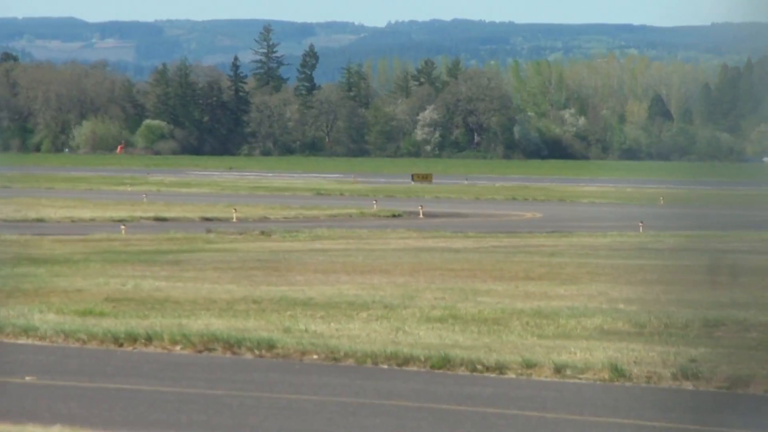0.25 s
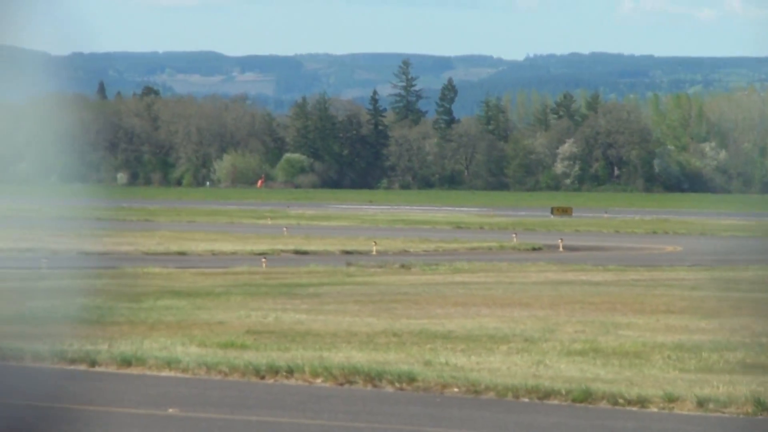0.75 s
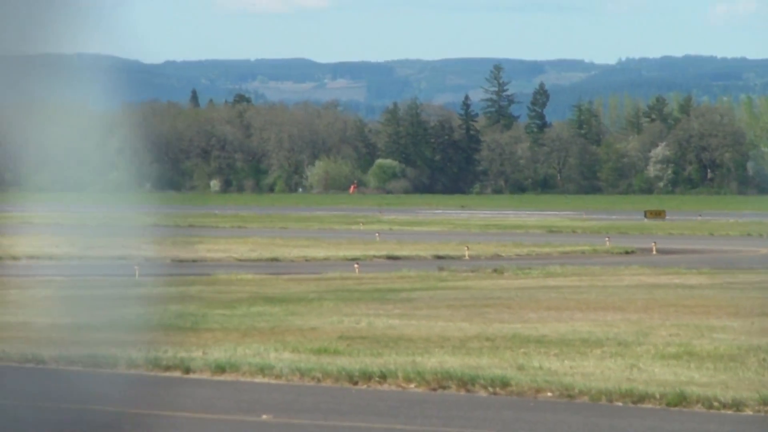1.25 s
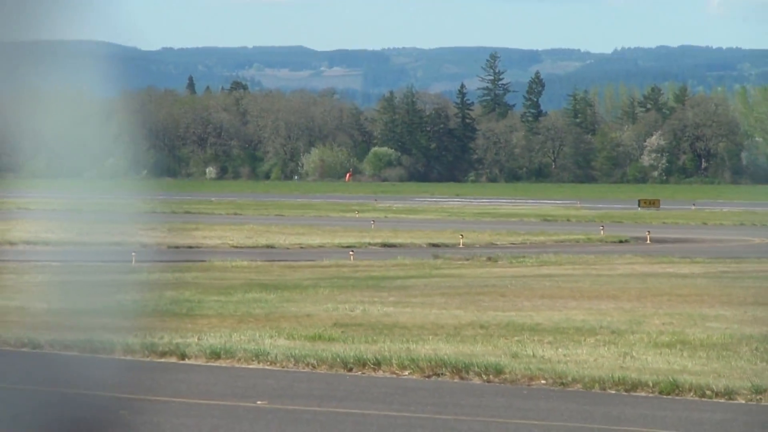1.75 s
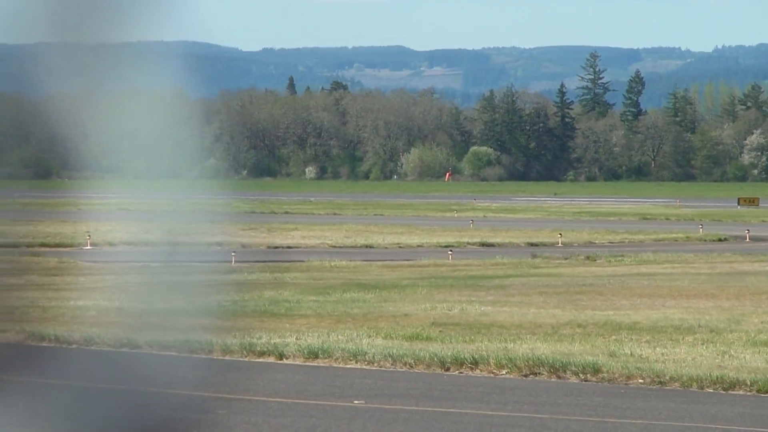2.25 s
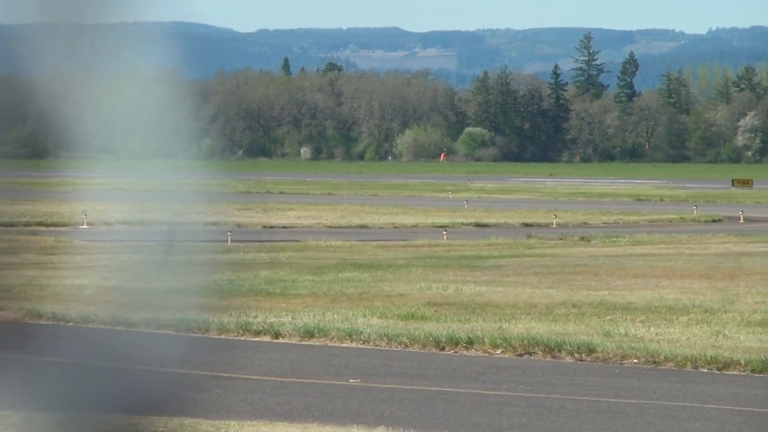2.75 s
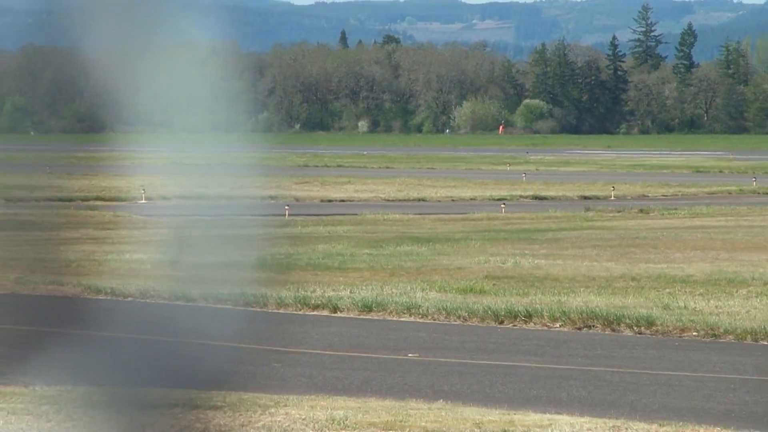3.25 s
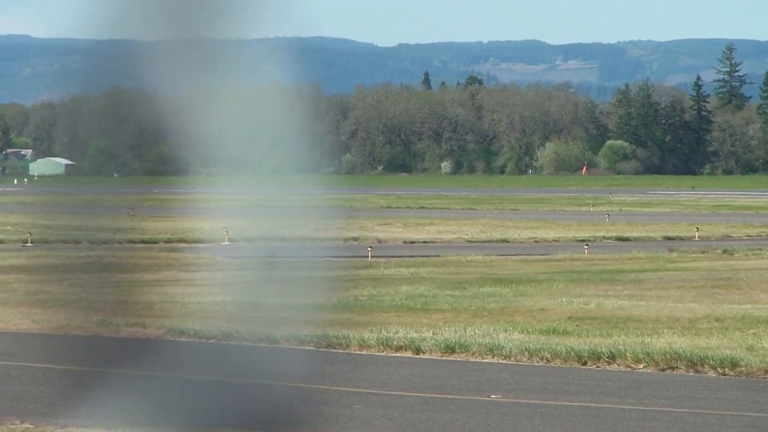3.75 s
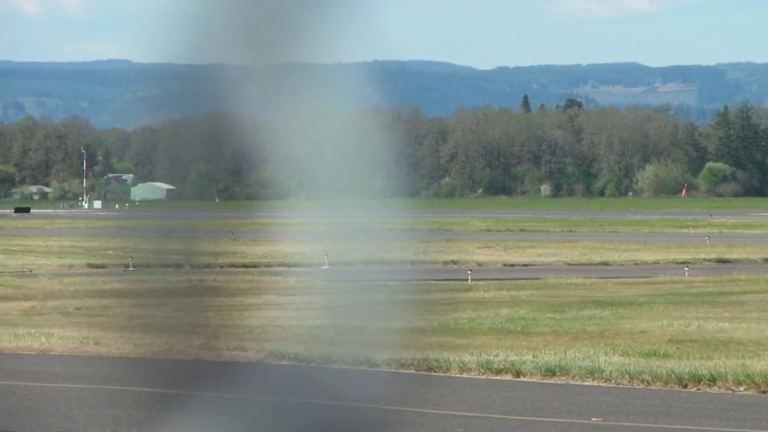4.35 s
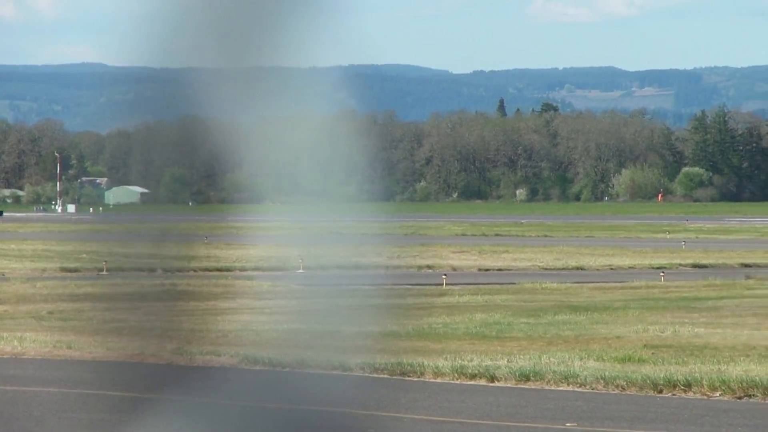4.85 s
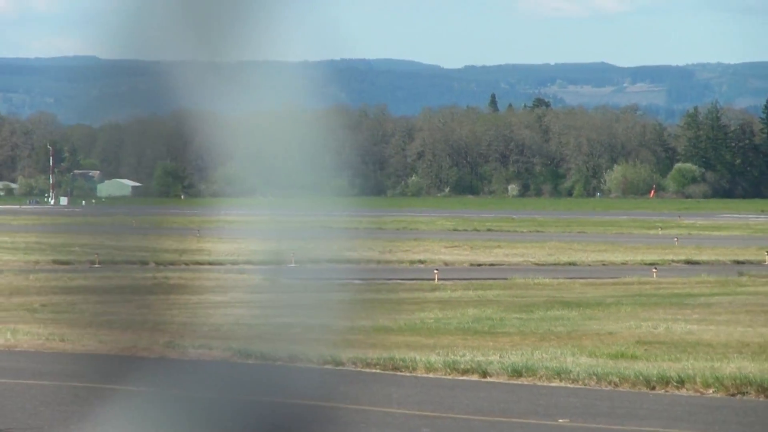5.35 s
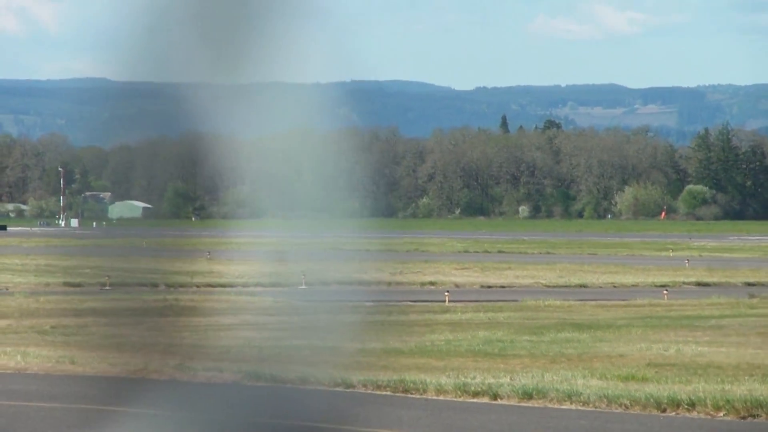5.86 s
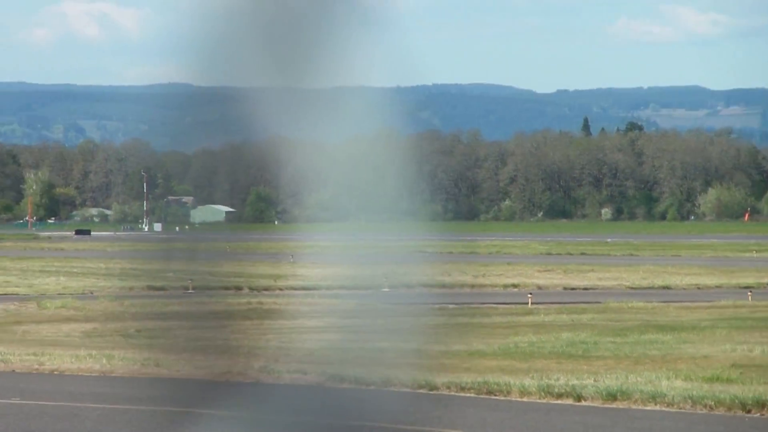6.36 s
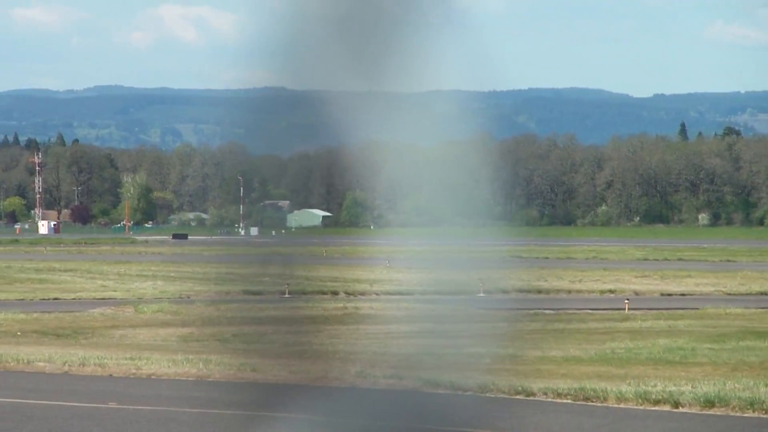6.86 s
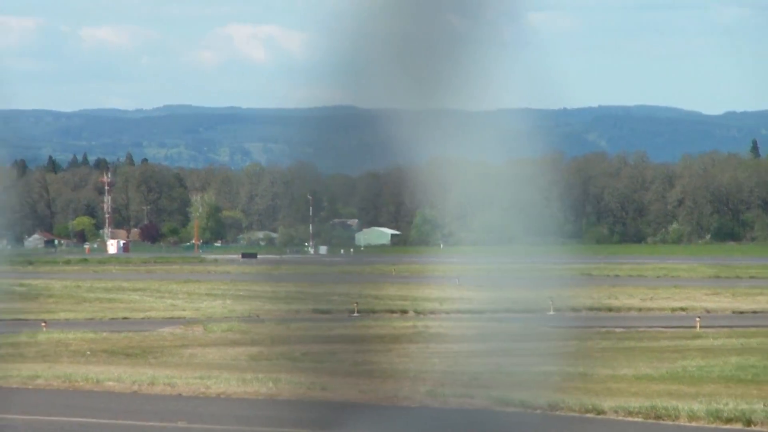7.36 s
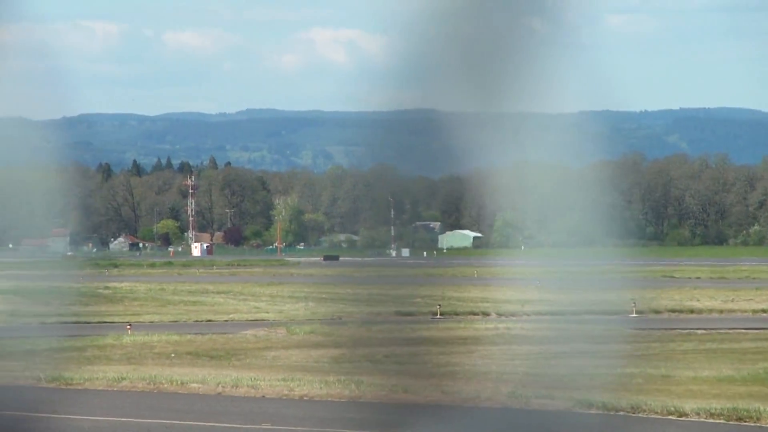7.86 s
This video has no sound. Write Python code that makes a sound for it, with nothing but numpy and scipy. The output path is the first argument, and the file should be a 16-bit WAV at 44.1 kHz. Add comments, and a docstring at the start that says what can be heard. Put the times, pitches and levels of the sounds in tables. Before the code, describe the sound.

Low, fluttering wind thumps on the microphone and gradually eases, while a far jet rushes faintly and a camera lens motor whirs.

```python
"""Windy camera at an airfield fence.

Wind buffets the left microphone port of a hand-held camera while a jet rushes far off. The sheltered
right port hears the lens motors ring the shell: they step once a picture field, then pause for a second
and whistle. A finger knocks twice, the focus peeps, the electronics whine and hiss. The recorder widens
the stereo, cuts three narrow notches and ticks on hard gusts."""
import sys
import numpy as np
from scipy import signal
from scipy.fft import rfft, irfft, next_fast_len
from scipy.io import wavfile
from scipy.ndimage import uniform_filter1d

SR = 44100
rng = np.random.default_rng(int(sys.argv[2]) if len(sys.argv) > 2 else 0)


def file_out(sig):
    """Save sig as 16-bit WAV at sys.argv[1]."""
    # one column per channel
    cols = np.atleast_2d(sig).T
    # limit, then scale
    lim = np.clip(cols, -1, 1)
    pcm = np.round(lim * 32767).astype(np.int16)
    wavfile.write(sys.argv[1], SR, pcm)


N = 358091
T = np.arange(N) / SR

# Fader and tone ride of the wind: t/s, level/dB, brightness above 450 Hz/dB
WIND_RIDE = [(0.0, -34, 8), (0.05, -15, -1.5), (0.18, -15, -1.5), (0.5, -17.5, -3.5), (1.0, -16.5, -6.5),
             (1.25, -18.5, 0), (1.5, -15.5, -7), (2.1, -19, -1.5), (2.4, -17, -3), (2.75, -18, -8.5),
             (2.95, -19, -7.5), (3.3, -21.5, -8), (3.6, -21, -11), (3.9, -23.5, -11), (4.36, -23.5, -27),
             (4.43, -36, -10), (4.5, -25.5, -35), (4.86, -24, -8.5), (5.1, -25.5, -23), (5.43, -26.5, -32),
             (5.57, -23, -11), (5.67, -29, -32), (5.87, -22, -4), (5.91, -28, -7), (6.0, -13.5, -17),
             (6.22, -36.5, -7), (6.44, -21, -37), (6.5, -28, -16), (6.64, -22.5, -11), (6.93, -31.5, -27),
             (7.0, -20, -44), (7.17, -22.5, -8), (7.3, -23, -34), (7.6, -24.5, -23), (7.95, -21, -31),
             (8.04, -16, -28), (8.12, -25, -18)]
# Body of the eddies: f/Hz, level/dB
EDDY_EQ = [(60, -47.5), (110, -13), (170, -4.5), (280, 2), (400, -0.5), (550, -2.5), (750, -10),
           (1000, -22), (1400, -51), (2000, -40)]
# Low bed under the eddies: f/Hz, level/dB
RUMBLE_EQ = [(20, -44.5), (32, -28), (50, -28), (80, -11.5), (130, -3), (190, 1), (280, -1), (400, -19)]
STRONG_WIND_DB, FLUTTER_DB, FLUTTER_HZ, BRIGHT_FLICKER_DB = -18, 1.5, 32.4, 2


def wind(eddies_per_s, clump_db, rumble_db):
    """Eddies of uneven size cross a port in clumps, over a smooth rumble that follows their force."""
    level_db, bright_db = in_time(WIND_RIDE)
    bright_db = bright_db + BRIGHT_FLICKER_DB * drift(9)
    eddies = (rng.random(N) < eddies_per_s / SR) * rng.standard_normal(N)
    clumps = np.minimum(drift(65) + 0.84 * drift(18), 1.3)
    flow = colour(eddies * amp(clump_db * clumps + FLUTTER_DB * drift(FLUTTER_HZ)), EDDY_EQ)
    body = signal.sosfiltfilt(signal.butter(2, 450, fs=SR, output="sos"), flow)
    force_db = uniform_filter1d(level_db, size=SR // 2) - STRONG_WIND_DB
    rumble = colour(rng.standard_normal(N), RUMBLE_EQ)
    rumble *= amp(STRONG_WIND_DB + 0.55 * force_db + rumble_db)
    return amp(level_db) * (body + amp(bright_db) * (flow - body)) + rumble


# Hard puffs, the accents of the wind: crest t/s, level/dB, f/Hz, snap relative to the puff/dB
PUFF_HITS = [(0.032, -3.5, 266, -26), (0.103, -8, 470, -14), (0.152, -2, 485, -25), (0.167, -8.5, 443, 0.5),
             (0.178, -7, 450, -8), (0.198, -2, 370, -15), (0.21, -7.5, 370, -1), (0.242, -5, 450, -15),
             (0.295, -7.5, 426, -3.5), (0.335, -2.5, 367, -20), (0.451, -2, 346, -17),
             (0.51, -10.5, 340, -3), (0.55, -8, 370, -17), (0.564, -4, 338, -6), (0.573, -14, 360, 5),
             (0.633, -1.5, 390, -20), (0.647, -6, 304, -5), (0.722, -4, 460, -19), (0.786, -11, 340, -9),
             (0.803, -5.0, 340, -18), (0.875, -7.5, 295, -14), (0.889, -9, 400, -3), (0.919, -5.5, 368, -7),
             (0.95, -7.0, 300, -10), (0.979, -3.5, 403, -8), (1.047, -7, 400, -15), (1.063, -6.5, 346, -23),
             (1.172, -0.5, 306, -27), (1.187, -6.5, 456, -10), (1.213, -3.5, 320, -17),
             (1.229, -2, 425, -16), (1.238, -7, 310, -7), (1.321, -4.5, 287, -26), (1.381, -6, 352, -28),
             (1.438, -4, 307, -11), (1.501, -5.5, 356, -19), (1.521, -4, 308, -18), (1.588, -11, 383, -22),
             (1.616, -15, 350, -17), (1.66, -6, 436, -15), (1.685, -8, 352, -8), (1.725, -5, 280, -11),
             (1.742, -11.5, 440, -8), (1.8, -6.0, 360, -14), (1.869, -3, 417, -24), (1.905, -2.5, 340, -16),
             (1.953, -4, 410, -12), (1.972, -8, 352, -21), (1.984, -7, 303, -23), (2.065, -2, 354, -14),
             (2.083, -7, 270, -13), (2.184, -3.5, 294, -23), (2.195, -4.5, 426, -13), (2.224, -8, 420, -10),
             (2.281, -4.5, 398, -9), (2.305, -12, 328, -19), (2.35, -8, 340, -17), (2.389, -7, 424, -1.5),
             (2.446, -5, 377, -21), (2.465, -9, 340, -18), (2.517, -7.5, 333, -20), (2.642, -7.5, 365, -24),
             (2.702, -6.5, 302, -26), (2.746, -7, 314, -23), (2.886, -8, 400, -21), (2.914, -4, 393, -14),
             (2.935, -11, 265, -1.5), (3.053, -8.5, 320, -24), (3.092, -9.5, 265, -20),
             (3.183, -7.5, 337, -13), (3.202, -10, 423, -18), (3.225, -9.5, 310, -21),
             (3.292, -9.5, 340, -17), (3.347, -9, 320, -17), (3.465, -2.5, 390, -11),
             (3.498, -2.5, 315, -21), (3.589, -9, 300, -14), (3.743, -9.5, 270, -19), (3.833, -9, 350, -27),
             (3.847, -9.5, 242, -24), (3.979, -9, 336, -15), (4.021, -9.5, 320, -17),
             (4.097, -11, 282, -23), (4.373, -12, 316, -26), (4.481, -11.5, 340, -28), (4.51, -8, 298, -19),
             (4.599, -9.5, 286, -25), (4.625, -10, 378, -18), (4.666, -10.5, 265, -18),
             (4.809, -14, 330, -20), (4.855, -9, 305, -24), (4.866, -10.5, 366, -13),
             (5.051, -7.5, 310, -13), (5.097, -13.5, 370, -28), (5.153, -15, 314, -17),
             (5.525, -13, 243, -23), (5.568, -11, 327, -23), (5.578, -6.5, 340, -34),
             (5.746, -12.5, 300, -23), (5.841, -5, 265, -23), (5.85, -14, 332, -11), (5.87, -8, 240, -20),
             (5.879, -9.5, 332, -23), (5.965, -10, 355, -22), (5.993, -4.5, 310, -13),
             (6.103, -12, 309, -21), (6.351, -13, 266, -22), (6.39, -14.5, 274, -23),
             (6.441, -5.5, 288, -29), (6.47, -11.5, 312, -23), (6.549, -11.5, 410, -20),
             (6.591, -11, 294, -15), (6.636, -7, 310, -35), (6.77, -11, 264, -23), (7.035, -10, 292, -26),
             (7.049, -10, 272, -21), (7.107, -12.5, 264, -26), (7.129, -12, 298, -17),
             (7.171, -8, 322, -21), (7.435, -13, 294, -11), (7.569, -10.5, 365, -26),
             (7.678, -16, 282, -26), (7.837, -8.5, 288, -18), (8.037, -3.5, 315, -28),
             (8.048, -11, 282, -22)]


def puffs(cycles=3.17, snap_hz=730):
    """Each hard puff pushes the membrane either way; a shorter snap rides on its crest."""
    out = np.zeros(N)
    for (s, db, hz, snap_db), (phase, way) in zip(PUFF_HITS, rng.random((len(PUFF_HITS), 2)) - .5):
        thump = amp(db) * swing(hz, cycles, phase)
        snap = amp(db + snap_db) * swing(snap_hz, cycles, phase)
        for part in thump, snap:
            at = int(s * SR) - len(part) // 2
            out[at:at + len(part)] += np.sign(way) * part
    return out


def swing(hz, cycles, phase):
    """One sharp swing of the membrane with a small swing on both sides."""
    size = int(cycles / hz * SR)
    return np.hanning(size) ** 2 * np.cos(2 * np.pi * hz * (T[:size] - T[size // 2]) + phase)


def puff_ducking(depth=0.45, span_s=0.0071):
    """Gain that ducks the flow where it bunches into a hard puff."""
    crests = clicks([s for s, *_ in PUFF_HITS], 1)
    dips = signal.fftconvolve(crests, np.hanning(int(span_s * SR)), "same")
    return 1 - np.clip(depth * dips, 0, .9)


# Resonances of the camera shell: f/Hz, t60/s, light step/dB, heavy step/dB, knock/dB, hum/dB,
# hum change in the pause/dB
SHELL_MODES = [(693, 0.026, -55, -32.5, 0, -57.5, -10), (902, 0.026, -56.5, -28.5, 7, -54.5, -15),
               (1053, 0.06, -72, -44.5, -30, -67, 11.5), (1418, 0.024, -56, -51, -30, -52.5, 0.5),
               (1544, 0.023, -40.5, -26, 12, -46.5, -2.5), (1844, 0.014, -31, -30.5, 4.5, -43, -2),
               (2390, 0.037, -58.5, -50, -3.5, -73.5, -13), (3770, 0.0043, -42.5, -47, -26, -65, -27),
               (4656, 0.0072, -55.5, -51.5, -53, -71, -10), (5760, 0.0083, -55, -60.5, -43, -87.5, -10),
               (7200, 0.0014, -56.5, -57.5, -40, -86, 2), (8100, 0.0046, -49, -51, -54, -93, 1)]
# Force of the steps, one list before the pause and one after: t/s, level/dB
STEP_RIDES = [
    [(0.0, -2), (5.22, 0)],
    [(6.26, 1), (8.12, -2)],
]
# Bright snaps as the stepping stops and starts: t/s, level/dB
CLUTCH_SNAPS = [(5.228, -37.5), (6.23, -37.5), (6.246, -47)]
FIELD_HZ, FIRST_STEP_S, GEAR_PLAY_S = 60 / 1.001, .0072, .0006
LIGHT_SPREAD_DB, HEAVY_SPREAD_DB, TONE_SPREAD_DB = 2.2, 3.4, 1.8
PAUSE_START_S, PAUSE_END_S = 5.235, 6.24
PAUSED = (T > PAUSE_START_S) & (T < PAUSE_END_S)


def camera_shell():
    """Motor steps, heavy and light in turn, ring the shell, as do motor hum, clutch and finger."""
    steps = np.arange(FIRST_STEP_S, N / SR - .01, 1 / FIELD_HZ)
    count = len(steps)
    heavy = np.arange(count) % 2 == 0
    running = (steps < PAUSE_START_S) | (steps > PAUSE_END_S)
    force_db = np.interp(steps, *np.transpose(STEP_RIDES[0] + STEP_RIDES[1]))
    force_db += np.where(heavy, HEAVY_SPREAD_DB, LIGHT_SPREAD_DB) * rng.uniform(-1.46, 1, count)
    force = amp(force_db) * running * rng.choice([-1, 1], count)
    landing_s = .002 + GEAR_PLAY_S * (rng.random(count) - .5)
    clutch_s, clutch_db = np.transpose(CLUTCH_SNAPS)
    clutch = clicks(clutch_s, amp(clutch_db))
    finger = finger_knocks()
    out = np.zeros(N)
    for hz, t60, light_db, heavy_db, knock_db, hum_db, pause_db in SHELL_MODES:
        mode_db = np.where(heavy, heavy_db, light_db) + TONE_SPREAD_DB * rng.standard_normal(count)
        # a heavy step hits the low modes together, a little late; all else rattles
        late_s = np.where(heavy & (hz < 1700), landing_s, rng.uniform(0, .0011, count))
        blows = clicks(steps + late_s, force * amp(mode_db)) + clutch * (hz > 2000)
        hum = amp(hum_db + pause_db * PAUSED) * unit(ring(rng.standard_normal(N), hz, t60))
        knock = amp(knock_db) * ring(finger, hz, t60=min(t60, .009))   # the finger damps the shell
        # soft contacts carry little above each mode
        out += band(ring(blows, hz, t60) + hum + knock, "low", 1.207 * hz)
    return band(out, "high", 510)


# Handling knocks: t/s, level/dB, hardness as low-pass f/Hz
FINGER_HITS = [(0.6141, -10.8, 8000), (2.911, -26, 2000)]


def finger_knocks(bounce_s=.0012, bounce_db=-5.5):
    """Force of a finger that strikes the shell and bounces once, softly."""
    out = np.zeros(N)
    for s, db, top_hz in FINGER_HITS:
        bounce = band(clicks([s + bounce_s], amp(db + bounce_db)), "low", 2600)
        out += band(clicks([s], amp(db)) + bounce, "low", top_hz)
    return out


# Pitch bends of the whistle: arrival t/s, aim f/Hz, hold/s
WHISTLE_BENDS = [(5.272, 7340, 0.0053), (5.318, 4200, .008), (5.347, 4900, .02), (5.374, 4700, 0.045),
                 (5.488, 8630, 0.0032), (5.606, 6500, 0.0033), (5.67, 4250, .012), (5.703, 4650, .03),
                 (5.783, 7670, 0.0054), (5.855, 4650, 0.058), (5.92, 5940, 0.0074), (5.988, 7200, 0.0045),
                 (6.085, 6550, 0.04), (6.13, 6100, .03), (6.2, 8800, .035)]
REST_HZ, GLIDE_HZ_PER_S = 5280, 62000


def whistle_pitch():
    """From its rest the motor glides at one speed to each aim, holds, and glides back."""
    hz = np.full(N, float(REST_HZ))
    for s, aim_hz, hold_s in WHISTLE_BENDS:
        away_s = np.maximum(np.maximum(s - T, T - s - hold_s), 0)
        reach_hz = np.maximum(abs(aim_hz - REST_HZ) - GLIDE_HZ_PER_S * away_s, 0)
        hz = np.where(reach_hz > abs(hz - REST_HZ), REST_HZ + np.sign(aim_hz - REST_HZ) * reach_hz, hz)
    return hz


def motor_whistle(rest_db=-66.5, db_per_khz=1.8, octave_db=1.5, air_db=-19):
    """In the pause the free-running motor sings at a rate that moves in stairs; faster is louder."""
    hz = whistle_pitch()
    stairs_hz = hz[np.arange(N) // 350 * 350]
    # scratchier while it glides or crawls
    scratch = .045 * np.clip(abs(np.gradient(hz)) * SR / 30000, np.where(hz < REST_HZ, .7, .3), 1)
    phase = 2 * np.pi * np.cumsum(stairs_hz * (1 + scratch * drift(300))) / SR
    gate = uniform_filter1d(1. * PAUSED, size=200)
    level = gate * amp(rest_db + db_per_khz * (hz - REST_HZ) / 1000 + 2.5 * drift(40))
    slow = uniform_filter1d(np.clip((5400 - stairs_hz) / 100, 0, 1), size=200)
    song = level * (np.sin(phase) + slow * amp(octave_db) * np.sin(2 * phase))
    air = amp(air_db) * level * (np.sin(2 * phase) + np.sin(3 * phase))
    # the shell passes two bands
    song = band(band(song, "high", 5150, order=8), "low", 10350, order=10)
    return song + band(air, "high", 14200, order=12)


# Focus peeps: centre t/s, rung of the pitch ladder
PEEP_CUES = [(0.216, 9), (1.4, 12), (1.51, 12), (2.63, 12), (2.65, 10), (2.752, 11), (2.772, 13),
             (2.84, 12), (2.938, 11), (2.955, 10), (2.985, 14), (3.15, 13), (3.172, 11), (3.235, 8),
             (3.252, 9), (3.32, 9), (3.37, 8), (3.405, 8), (3.62, 13), (3.638, 11), (3.687, 9), (4.17, 8),
             (4.205, 8), (4.24, 8), (4.272, 8), (4.306, 8), (4.372, 12), (4.605, 11), (4.62, 9),
             (4.875, 11), (4.888, 9), (6.975, 11), (7.095, 12), (7.11, 11), (7.157, 12), (7.177, 11),
             (7.508, 10), (7.59, 12), (7.74, 12), (7.862, 13), (7.88, 12), (7.94, 8)]


def focus_peeps(rung_hz=480, level_db=-63.5, spread_db=2, length_s=0.024):
    """The focus motor gives brief, slightly unsteady peeps on a ladder of pitches."""
    out, size = np.zeros(N), int(length_s * SR)
    phase = 2 * np.pi * np.cumsum(rung_hz * (1 + .003 * drift(150))) / SR
    for (s, rung), chance in zip(PEEP_CUES, rng.uniform(-0.9, 1, len(PEEP_CUES))):
        at = int(s * SR) - size // 2
        db = level_db + spread_db * chance + 3.5 * max(10 - rung, 0)   # low rungs are louder
        out[at:at + size] += amp(db) * np.hanning(size) * np.sin(rung * phase[at:at + size])
    return out


# Slow swell of the jet: t/s, level/dB
JET_RIDE = [(0, -46.5), (2, -45.5), (4, -44), (6, -46.5), (8.12, -44.5)]
# Its distant midrange rush: f/Hz, level/dB
JET_EQ = [(300, -29), (600, -2.5), (900, -2.5), (1200, -12.5), (1900, -13.5), (2400, -24.5), (2800, -29),
          (3500, -44)]


def far_jet():
    """A far jet rushes and wavers, weaker in the right port."""
    level = amp(in_time(JET_RIDE)[0] + 2 * drift(5.7))
    return level * colour(rng.standard_normal((2, N)), JET_EQ) * amp([[0], [-8]])


# Fader ride of the sensor whine: t/s, level/dB
SCAN_RIDE = [(0.0, -74), (1.0, -72), (2.3, -65), (3.9, -62.5), (8.12, -63.5)]
# Thin, steady electronic tones: f/Hz, level/dB, onset t/s
THIN_TONES = [(9000, -78.5, 1.5), (15000, -90.5, 1.5)]
SCAN_HZ = 4.5e6 / 572


def electronics():
    """The sensor scan whine flips its sign every frame, which splits it into a comb; two tones join."""
    flip = np.clip(40 * np.sin(np.pi * FIELD_HZ / 2 * T), -1, 1)
    whine = amp(in_time(SCAN_RIDE)[0]) * flip * np.sin(2 * np.pi * SCAN_HZ * T)
    return whine + sum(amp(db) * (T > s) * np.sin(2 * np.pi * hz * T) for hz, db, s in THIN_TONES)


# Noise floor: t/s, level/dB
HISS_RIDE = [(0.0, -64), (0.29, -70.5), (1.02, -67.5), (3.0, -67), (8.12, -67)]
# Its airy top: f/Hz, level/dB
HISS_EQ = [(2500, -20), (3500, -13), (4800, -14.5), (5600, -5), (7500, -4), (9000, -6.5), (10500, -14.5),
           (11400, -30), (13800, -39), (15000, -19), (16000, -20)]


def microphone_hiss():
    """Self-noise of the microphone, a little stronger on the left."""
    noise = colour(rng.standard_normal((2, N)), HISS_EQ)
    return amp(in_time(HISS_RIDE)[0]) * noise * amp([[1.5], [-1.5]])


# Sharp ticks on hard gusts: t/s, level/dB, low-treble body relative to the tick/dB
TICK_HITS = [(0.0305, -25.5, 8), (0.074, -41, 9), (0.1937, -36, 8), (0.979, -28, 14), (1.2292, -29, 8),
             (1.9037, -27, 8), (2.0638, -28.5, 14)]


def gust_ticks():
    """The recorder ticks: a bare click with some body, weaker and inverted on the right."""
    s, db, body_db = np.transpose(TICK_HITS)
    body = band(band(clicks(s, amp(db + body_db)), "low", 3500), "high", 1800)
    return (clicks(s, amp(db)) + body) * amp([[0], [-11]]) * [[1], [-1]]


def amp(db):
    """dB to gain."""
    return 10 ** (np.asarray(db) / 20)


def unit(x):
    """Scale to rms 1."""
    return x / np.sqrt(np.mean(x ** 2) + 1e-20)


def in_time(rows):
    """Table columns as curves over all samples."""
    s, *columns = np.transpose(rows)
    return [np.interp(T, s, c) for c in columns]


def colour(x, eq):
    """Shape a flat signal with an EQ curve; rms 1."""
    hz, db = np.transpose(eq)
    size = next_fast_len(N)
    grid_hz = np.fft.rfftfreq(size, 1 / SR) + 1
    gain = amp(np.interp(np.log(grid_hz), np.log(hz), db, left=-90, right=-90))
    return unit(irfft(rfft(x, size) * gain, size)[..., :N])


def drift(hz):
    """Smooth random modulation up to about hz; rms 1."""
    r = np.exp(-2 * np.pi * hz / SR)
    return unit(signal.lfilter([1], [1, -2 * r, r * r], rng.standard_normal(N + SR))[SR:])


def clicks(times, gains):
    """A train of one-sample clicks."""
    out = np.zeros(N)
    out[(np.asarray(times) * SR).astype(int)] = gains
    return out


def ring(x, hz, t60):
    """Resonator: a unit click sets a sine of height 1 ringing."""
    r, w = amp(-60 / (t60 * SR)), 2 * np.pi * hz / SR
    return signal.lfilter([0, np.sin(w)], [1, -2 * r * np.cos(w), r * r], x + 1e-18)


def band(x, kind, hz, order=2):
    """Butterworth low- or high-pass."""
    return signal.sosfilt(signal.butter(order, hz, kind, fs=SR, output="sos"), x)


def scene():
    """Left port: full wind; right port: machinery and faint wind; jet and hiss in both."""
    bed = far_jet() + microphone_hiss()
    buffeting = puff_ducking() * wind(eddies_per_s=900, clump_db=1.94, rumble_db=-7.5) + puffs()
    membrane = 0.63 * np.tanh(buffeting / 0.75)   # it stiffens on large swings
    left = band(membrane, "low", 1900, order=4)
    machinery = band(camera_shell() + focus_peeps(), "low", 12000, order=12)
    machinery += motor_whistle() + electronics()
    right = amp(-33) * wind(eddies_per_s=620, clump_db=2.3, rumble_db=6) + machinery
    leak = amp(-16) * band(machinery, "high", 5500)   # the shrill part crosses the shell
    return np.array([left + leak, right]) + bed


# Narrow cuts in the recorder's EQ: f/Hz, width/Hz
NOTCH_EQ = [(3000, 860), (4000, 540), (5000, 230)]
WIDEN_SHARE, TOP_CUT_HZ = 0.32, 16000


def record(dry):
    """The recorder widens by cross-subtracting lows and mids, notches, cuts bass, ticks and cuts top."""
    wide = dry - WIDEN_SHARE * band(dry[::-1], "low", 3000, order=1)
    for hz, width_hz in NOTCH_EQ:
        wide = signal.lfilter(*signal.iirnotch(hz, hz / width_hz, SR), wide)
    mix = band(wide, "high", 52, order=3) + gust_ticks()
    return signal.sosfilt(signal.cheby2(20, 70, TOP_CUT_HZ, fs=SR, output="sos"), mix)


dry = scene()
out = record(dry)
file_out(out)
```